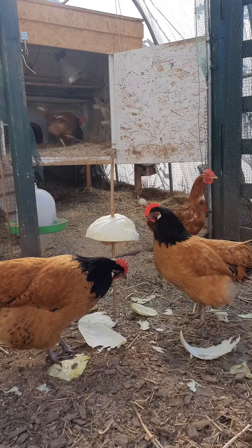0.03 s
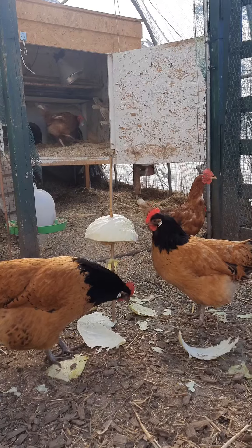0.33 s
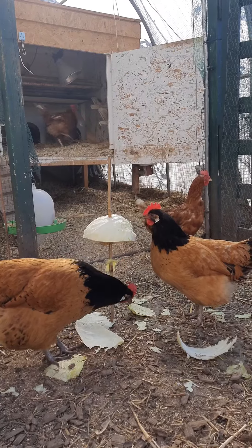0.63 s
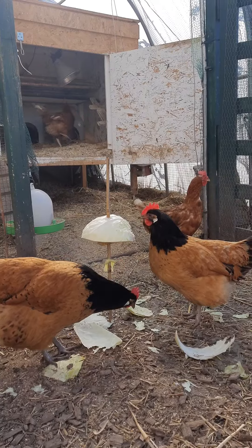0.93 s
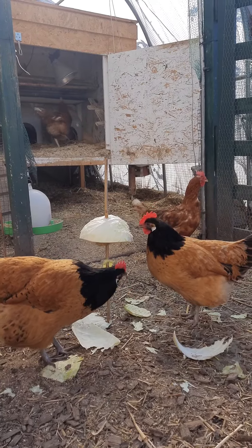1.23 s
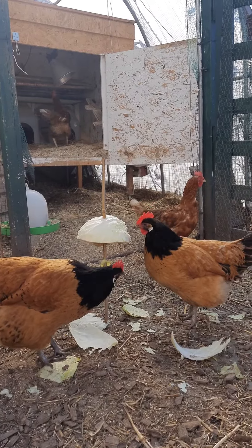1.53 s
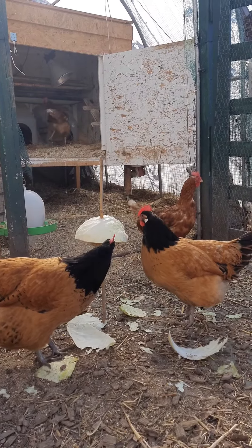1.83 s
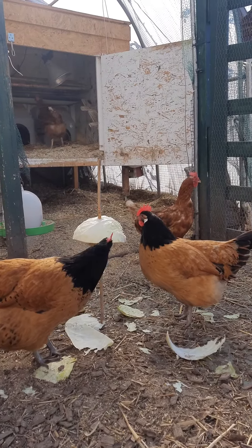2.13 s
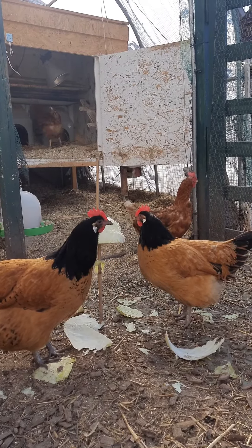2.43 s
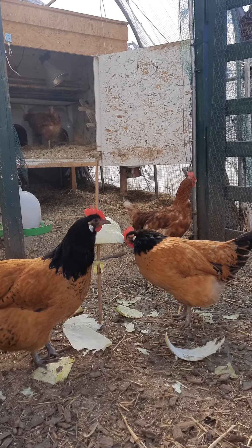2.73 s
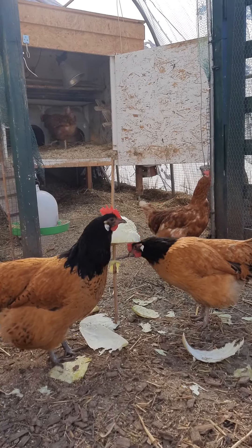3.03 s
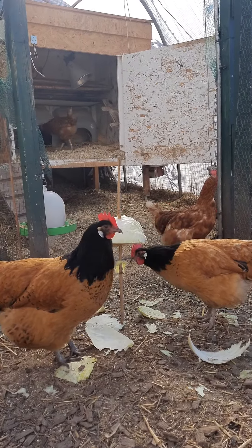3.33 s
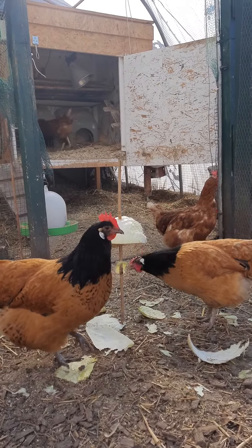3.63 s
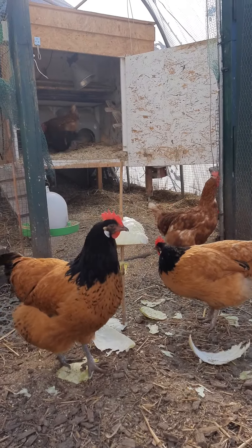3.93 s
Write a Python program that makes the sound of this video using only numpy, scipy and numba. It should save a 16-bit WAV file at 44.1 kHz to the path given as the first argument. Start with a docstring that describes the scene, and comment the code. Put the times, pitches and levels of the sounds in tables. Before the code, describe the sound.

A hen close by purrs very softly from 0.3 to 0.8 seconds, then holds a thin, wavering whine from 1.7. Rasping growls take over from about 2.3 seconds, ending in one sharp squawk at 3.7, the loudest sound. Light straw scuffs, a soft footfall and a brief moan close it. Another hen clucks faintly about twice a second, over quiet outdoor air in a covered run.

```python
"""Hens in a covered run, close to a phone. One purrs and moans, holds a thin wavering whine that breaks
into rasping growls, and gives a sharp squawk near the end. Another clucks about twice a second.
Each voice is the pulsing membrane of the syrinx, shaped by the throat; its rasp is scatter in the
period and force of the pulses. Feet stir the litter and thump the earth over outdoor air, a faint hum
and a rumble. Ground, boards and roof give the voices a short echo."""
import sys
import numpy as np
from scipy import signal
from scipy.fft import rfft, irfft, next_fast_len
from scipy.io import wavfile
from scipy.ndimage import uniform_filter1d
from numba import njit

SR = 44100
rng = np.random.default_rng(int(sys.argv[2]) if len(sys.argv) > 2 else 0)


def generate_wav(sig):
    """Save sig (samples, or channels by samples) to the path in sys.argv[1] as 16-bit PCM at SR."""
    pcm = np.round(np.clip(np.atleast_2d(sig).T, -1, 1) * 32767).astype(np.int16)
    wavfile.write(sys.argv[1], SR, pcm)


N = 176400

# The muffled tone of a closed beak. Each row: frequency in Hz, gain in dB.
CLOSED_BEAK_EQ = [(300,-51), (700,-12.5), (1400,-8), (2100,-18), (2600,-47), (16000,-61)]


def undb(db):
    """Decibels to gain."""
    return 10 ** (np.asarray(db) / 20)


def unit(x):
    """Scale to rms 1."""
    return x / np.sqrt(np.mean(x ** 2) + 1e-20)


def times():
    """Time of every sample in seconds."""
    return np.arange(N) / SR


def gain_at(hz, eq):
    """Gain of an EQ curve at the given frequencies."""
    f, db = np.array(eq, float).T
    return undb(np.interp(np.log(np.maximum(hz, 1)), np.log(f), db))


def colour(x, eq, phase=[(0, 0)]):
    """Filter by an EQ curve, with an optional phase lag."""
    n = x.shape[-1]
    size = next_fast_len(n + 2048)
    f = np.arange(size // 2 + 1) * SR / size
    lag = np.interp(f, *np.array(phase, float).T)
    return irfft(rfft(x, size) * gain_at(f, eq) * np.exp(-1j * lag), size)[..., :n]


def wobble(hz, size):
    """Random motion up to a given rate, spread 1."""
    f = np.arange(N // 2 + 1) * SR / N
    return unit(irfft(rfft(rng.standard_normal(N)) / np.sqrt(1 + (f / hz) ** 4), N))[:size]


def add(out, start, x):
    """Mix a sound in at a start time."""
    i = int(start * SR)
    out[i:i + len(x)] += x[:N - i]


def background(air_db=-67.5, side_db=-7, hum_hz=200.6, drift=0.0095):
    """Outdoor air, a swelling rumble and a wavering hum."""
    # Tone of the air and of the rumble. Each row: frequency in Hz, gain in dB.
    air_eq = [(25, -25), (125, -12.5), (196, -11.5), (394, -22.5), (2240, -45), (15000, -53)]
    rumble_eq = [(28, -27), (46, -3), (62, -16), (400, -50)]
    # Swells of the rumble and of the hum. Each row: time in seconds, level in dB.
    rumble_levels = [(0, -94.5), (1.9, -70), (2.3, -60), (2.7, -79.5), (4, -54.5)]
    hum_levels = [(0, -89), (.25, -67), (.95, -73), (1.35, -63), (1.8, -75)]
    fader = lambda levels: undb(np.interp(times(), *np.array(levels).T))
    mid, side = colour(rng.standard_normal((2, N)), air_eq)
    air = undb(air_db) * unit(mid + undb(side_db) * side * np.array([[1], [-1]]))
    rumble = unit(colour(rng.standard_normal(N), rumble_eq))
    pitch = hum_hz * (1 + drift * wobble(6.4, N))
    hum = unit(np.sin(2 * np.pi * np.cumsum(pitch) / SR))
    return air + rumble * fader(rumble_levels) + hum * fader(hum_levels)


def hops(size, mean_hold_s=.009):
    """The unstable membrane jumps between nearby pitches and holds each for a moment."""
    which = np.cumsum(rng.random(N) < 1 / (mean_hold_s * SR))
    steps = np.clip(rng.standard_normal(N), -2, 2)[which]
    return uniform_filter1d(steps, size=SR // 500)[:size]


def syrinx(hz, rough, throat=np.ones_like, jitter=.083, hop=.092, shiver=.032):
    """A membrane whose period and force scatter with roughness; throat gives each harmonic's gain."""
    n = len(hz)
    scatter = rough * (jitter * wobble(hz=485, size=n) + hop * hops(n))
    scatter += shiver * np.sqrt(rough) * wobble(hz=130, size=n)
    phase = 2 * np.pi * np.cumsum(hz * (1 + scatter)) / SR
    tone, power = np.zeros(n), np.zeros(n) + 1e-12
    for k in range(1, 19):
        gain = throat(k * hz) * (k * hz < SR * 2 / 5)
        tone += gain * np.sin(k * phase)
        power += gain ** 2 / 2
    rasp = 1 + undb(-1) * rough * wobble(hz=626, size=n)
    flutter = np.exp(.59 * np.sqrt(rough) * np.tanh(wobble(hz=75, size=n)))
    return tone / np.sqrt(power) * unit(rasp * flutter)


def voiced(hz, rough, throat_eq):
    """Syrinx pulses through a still throat, with the level kept even across pitches."""
    tone = colour(syrinx(hz, rough), throat_eq)
    power = sum(gain_at(k * hz, throat_eq) ** 2 for k in range(1, 9))
    return unit(tone / np.sqrt(power))


def purr(hz=980., rough=.85, rise_s=.0083, fall_s=.018):
    """A soft, rough note that beats about twenty times a second."""
    # Beats of the purr. Each row: peak time in seconds, level in dB.
    beats = [(0.334, -64.5), (0.381, -59.5), (0.432, -57), (0.527, -58), (0.584, -60), (0.626, -60.5),
             (0.675, -64.5), (0.723, -60), (0.776, -61.5)]
    t, envelope = times(), np.zeros(N)
    for s, db in beats:
        width = np.where(t < s, rise_s, fall_s)
        envelope += undb(db) * np.exp(-.5 * ((t - s) / width) ** 2)
    return envelope * voiced(np.full(N, hz), rough, CLOSED_BEAK_EQ)


def clucks(rough=.6, fall_per_s=2):
    """Each cluck is a few cycles of a low, falling note."""
    # The second hen. Each row: peak time in seconds, pitch in Hz, level in dB, half-width in seconds.
    notes = [(0.487, 596, -49.5, 0.0087), (0.499, 562.3, -39, 0.0029), (1.009, 502, -54.5, 0.008),
             (1.03, 561.5, -35.5, 0.0023), (1.703, 569.5, -43.5, 0.011), (2.292, 612, -41, 0.0074),
             (2.748, 610, -38, 0.0072), (3.242, 604.5, -42.5, 0.016), (3.751, 605.7, -35.5, 0.0039)]
    # Her hollow throat tone. Each row: frequency in Hz, gain in dB.
    throat_eq = [(250, -26), (550, 1.5), (1150, -1), (1750, 2.5), (2400, -39.5), (16000, -40)]
    out = np.zeros(N)
    t = np.arange(-SR // 25, SR // 25) / SR
    for s, hz, db, width in notes:
        note = voiced(hz * np.exp(-fall_per_s * t), rough, throat_eq)
        add(out, s + t[0], undb(db) * note / np.cosh(np.pi / 2 * t / width))
    return out


def contour(rows, fade_s=.003):
    """Time, pitch, gain and roughness along one call."""
    s, hz, db, rough = np.array(rows, float).T[:4]
    t = np.arange(int(s[0] * SR), int(s[-1] * SR)) / SR
    fade = np.clip(np.minimum(t - t[0], t[-1] - t) / fade_s, 0, 1)
    gain = fade * undb(np.interp(t, s, db))
    return t, np.interp(t, s, hz), gain, np.interp(t, s, rough)


def call(rows, throat_eq):
    """One gliding call through a throat that holds its shape."""
    out = np.zeros(N)
    t, hz, gain, rough = contour(rows)
    add(out, t[0], gain * voiced(hz, rough, throat_eq))
    return out


def moans():
    """Soft, sinking moans through a closed beak."""
    # One list per moan. Each row: time in seconds, pitch in Hz, level in dB, roughness (0 is clean).
    phrases = [
        [(1.21,1032,-66,0.5), (1.31,1026,-59.5,0.58), (1.34,1015,-71,0.27)],
        [(3.925,952,-66.5,1.1), (3.95,871,-48.5,0.82), (4.0,811,-40.5,0.41)],
    ]
    return sum(call(rows, CLOSED_BEAK_EQ) for rows in phrases)


def peep():
    """A tiny rising note from the syrinx."""
    # The peep's glide. Each row: time in seconds, pitch in Hz, level in dB, roughness.
    glide = [(1.315,1470,-69,.15), (1.365,1597,-72,0.23)]
    # Its throat tone. Each row: frequency in Hz, gain in dB.
    throat_eq = [(1500,-1), (3000,0), (9000,-35)]
    return call(glide, throat_eq)


def far_whine():
    """A thin, distant whine that sags in pitch."""
    # The whine's glide. Each row: time in seconds, pitch in Hz, level in dB, roughness.
    glide = [(1.41, 2114, -69.5, .14), (1.67, 2035, -67.5, .38)]
    return call(glide, CLOSED_BEAK_EQ)


def steady(x):
    """Even out slow changes of level and keep the quick grain."""
    return x / np.sqrt(uniform_filter1d(x ** 2, size=SR // 25) + 1e-12)


def whines(beat_hz=510, beat_depth=.18, rough_scale=.85):
    """A thin high tone; where it cracks, a second membrane adds side tones."""
    # One list per whine. Each row: time in seconds, pitch in Hz, level in dB, roughness.
    phrases = [
        [(1.67,1960,-69,0), (1.70,2117,-46.5,0.41), (1.73,2268,-46,0.38), (1.748,2022,-45.5,0.28),
         (1.775,1881,-46.5,0), (1.84,2060,-49,0.07), (1.92,1867,-51.5,0.03), (2.02,2078,-47.5,0),
         (2.055,1869,-48,0.01), (2.108,2092,-49.5,0.11), (2.118,2350,-56.5,0.29), (2.16,2253,-51,0.14),
         (2.20,2158,-50,0.01), (2.235,2366,-47.5,0.41), (2.27,2014,-44,.25), (2.30,1836,-47.5,0.77)],
        [(2.51,1960,-63,0.4), (2.55,2147,-55,0.07), (2.59,2232,-50.5,.08), (2.61,1942,-46.5,0),
         (2.635,1913,-50.5,0.5)],
    ]
    # The bright throat tone. Each row: frequency in Hz, gain in dB.
    throat_eq = [(1200,-15), (2000,2.5), (4000,2.5), (6000,-13), (7700,-27), (9500,-16.5), (15000,-32)]
    out = np.zeros(N)
    for rows in phrases:
        t, hz, gain, rough = contour(rows)
        beat = beat_depth * rough * np.sin(2 * np.pi * beat_hz * t + wobble(75, len(t)))
        tone = syrinx(hz * (1 + beat), rough_scale * rough)
        add(out, t[0], gain * steady(colour(tone, throat_eq)))
    return out


@njit
def resonate(x, hz, width):
    """A resonance with a moving centre, gain 1 at its peak."""
    y, band, low = np.empty(len(x)), 0., 0.
    for i in range(len(x)):
        g, damping = np.tan(np.pi * hz[i] / SR), width / hz[i]
        v = (band + g * (x[i] - low)) / (1 + g * (g + damping))
        band, low = 2 * v - band, low + 2 * g * v
        y[i] = damping * v
    return y


def growls(ring_width_hz=640., ring_db=13):
    """Rough pulses ring a narrow throat resonance that slides as the beak moves."""
    # One list per growl. Each row: time in seconds, pitch in Hz, level in dB, roughness, resonance in Hz.
    phrases = [
        [(2.245,1400,-75,0.65,2680), (2.275,1380,-43.5,.6,2840), (2.32,1330,-42,0.34,2580),
         (2.355,1130,-44.5,0.84,1900), (2.40,1110,-47,0.81,1912), (2.435,1120,-46,0.74,2070),
         (2.475,1330,-48,0.77,2920), (2.52,1700,-63,0.55,3620)],
        [(2.615,1680,-62,0.05,1940), (2.65,1480,-42,0.78,2210), (2.675,1600,-45,.3,1840),
         (2.705,1480,-43,0.91,2144), (2.78,1130,-44,0.9,1810), (2.84,1300,-45,0.51,2440),
         (2.862,1850,-48.5,0.7,4100), (2.885,1290,-41,0.2,2800), (2.945,1220,-41,0.79,2100),
         (2.972,1000,-38.5,0.32,2050), (3.0,770,-43.5,.5,1780), (3.015,725,-57,0.16,1890)],
        [(3.15,1050,-71,0.31,2040), (3.20,1350,-61,0.33,1420), (3.25,1080,-49,0.95,2100),
         (3.295,1080,-53.5,0.82,3120), (3.345,1160,-52,0.36,4430), (3.39,1350,-48.5,0.92,3150),
         (3.435,1130,-43.5,0.83,2030), (3.492,1290,-45,0.67,1880), (3.512,1400,-46,0.73,4400),
         (3.535,1040,-63,0.24,1940), (3.645,940,-49.5,0.54,1720), (3.69,870,-46.5,0,1770)],
    ]
    # The throat tone under the resonance. Each row: frequency in Hz, gain in dB.
    throat_eq = [(600,-8), (1150,7), (2100,3.5), (2800,-8), (4300,-10), (5700,-6.5), (7800,-21.5),
                 (9300,-11), (16000,-27)]
    out = np.zeros(N)
    for rows in phrases:
        t, hz, gain, rough = contour(rows)
        s, *_, centre = np.array(rows, float).T
        pulses = colour(syrinx(hz, rough), throat_eq)
        ring = resonate(pulses, np.interp(t, s, centre), ring_width_hz)
        add(out, t[0], gain * steady(pulses + undb(ring_db) * ring))
    return out


def litter(grain_db=4, right_db=-8):
    """Dry straw crackles under the feet."""
    # Scuffs of the feet. Each row: peak time in seconds, level in dB, half-width in seconds.
    scuffs = [(3.64, -53, 0.028), (3.86, -49.5, 0.0063), (3.95, -57.5, 0.079)]
    # The crisp top of the straw. Each row: frequency in Hz, gain in dB.
    straw_eq = [(3000, -3), (9000, 10.5), (16000, 10)]
    swell = sum(undb(db) * np.exp(-.5 * ((times() - s) / width) ** 2) for s, db, width in scuffs)
    grains = rng.standard_normal((2, N)) * undb(grain_db * wobble(750, N))
    return swell * unit(colour(grains, straw_eq)) * undb([[0], [right_db]])


def squawk(peak_width_hz=220, peaks_db=(24, 18.5)):
    """A clean cry that rises and drops; two throat resonances sweep down through its harmonics."""
    # The cry's arc. Each row: time in seconds, pitch in Hz, level in dB, roughness.
    glide = [(3.68, 863.4, -47, 0.08), (3.70, 989, -36.5, 0.19), (3.722, 1080, -18, 0),
             (3.742, 1084, -26, 0.08), (3.753, 1064, -24.5, 0.14), (3.764, 1029, -29, 0.01),
             (3.772, 907, -45.5, 0.42)]
    # The falling resonances. Each row: time in seconds, lower centre in Hz, upper centre in Hz.
    sweep = [(3.69, 4870, 7260), (3.712, 4640, 7260), (3.723, 4360, 5880), (3.737, 3300, 5500),
             (3.754, 2130, 5180)]
    # The throat tone under the sweep. Each row: frequency in Hz, gain in dB.
    throat_eq = [(500, 51), (1080, -7), (2150, -1), (3200, -15), (4300, -6.5), (5400, -19.5), (7600, -16.5),
                 (8800, 1.5), (12000, -6.5), (16000, -15)]
    t, hz, gain, rough = contour(glide)
    s, *tracks = np.array(sweep, float).T
    centres = [np.interp(t, s, track) for track in tracks]

    def throat(f):
        """Gain of the throat with both moving peaks."""
        boost_db = sum(db / (1 + ((f - c) / peak_width_hz) ** 2) for c, db in zip(centres, peaks_db))
        return gain_at(f, throat_eq) * undb(boost_db)
    out = np.zeros(N)
    add(out, t[0], gain * syrinx(hz, rough, throat))
    return out


def footfall(at_s=3.79, hz=125, db=-35.5, rise_fall_s=.005):
    """A foot lands on the earth with a soft thump."""
    t = times() - at_s
    return undb(db) * np.sin(2 * np.pi * hz * t) * np.exp(-np.abs(t) / rise_fall_s)


def enclosure(x, early_db=-7, roof_db=-16.5):
    """Quick reflections from ground and boards, then the short ring of the roof."""
    # Tone of the echoes. Each row: frequency in Hz, gain in dB.
    echo_eq = [(300, 11.5), (2200, 4), (4500, 9.5), (16000, -8)]
    t = np.arange(SR // 2) / SR

    def tail(t60_s):
        """Scattered echoes, different on each side."""
        echoes = rng.standard_normal((2, len(t))) * undb(-60 * t / t60_s) * (t > .002)
        return unit(echoes) / np.sqrt(len(t))
    response = undb(early_db) * tail(t60_s=.06) + undb(roof_db) * tail(t60_s=.25)
    return signal.fftconvolve(colour(x, echo_eq)[None], response, axes=1)[:, :N]


def scene(cluck_left_db=-7, cluck_right_lag_s=0.000085):
    """The hens reach the phone's two ports at slightly different times; the run echoes them."""
    # Right port against left for the voices ahead. Each row: frequency in Hz, gain in dB.
    right_eq = [(500, 9), (1150, -9.5), (2200, 8), (3200, -1), (6500, 7), (9000, -9.5), (15000, -97)]
    # That port's phase. Each row: frequency in Hz, lag in radians.
    right_phase = [(0, -3), (1150, 0.68), (2100, 2), (2700, 5), (3300, 8.5), (4300, 8.5), (16000, 15.5)]
    ahead = whines() + growls() + peep() + moans() + far_whine() + purr() + squawk()
    aside = clucks()
    aside_late = np.interp(times() - cluck_right_lag_s, times(), aside)
    left = ahead + undb(cluck_left_db) * aside
    right = colour(ahead, right_eq, right_phase) + aside_late
    return np.array([left, right]) + enclosure(ahead + aside) + litter() + footfall() + background()


def record(dry, top_hz=15800):
    """The phone cuts the top."""
    return signal.sosfilt(signal.ellip(10, .2, 80, top_hz, fs=SR, output="sos"), dry)


dry = scene()
out = record(dry)
generate_wav(out)
```